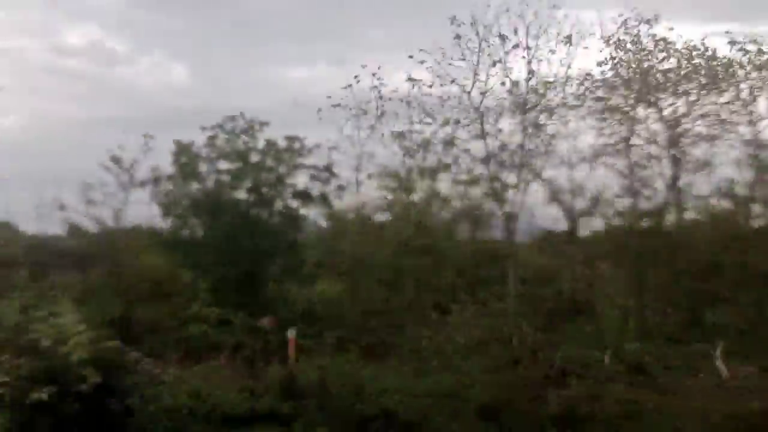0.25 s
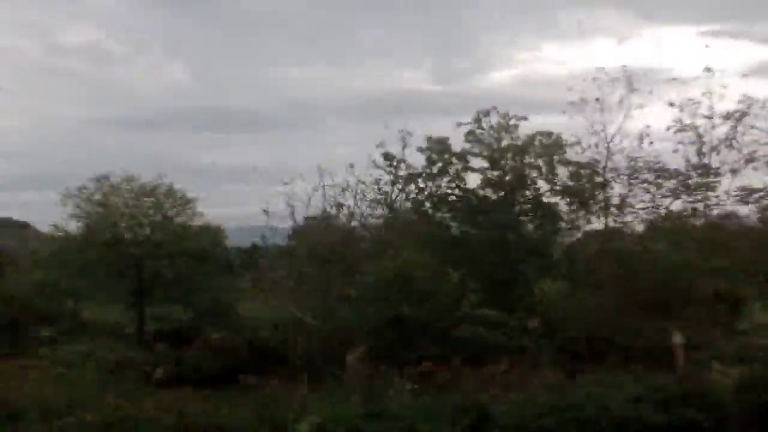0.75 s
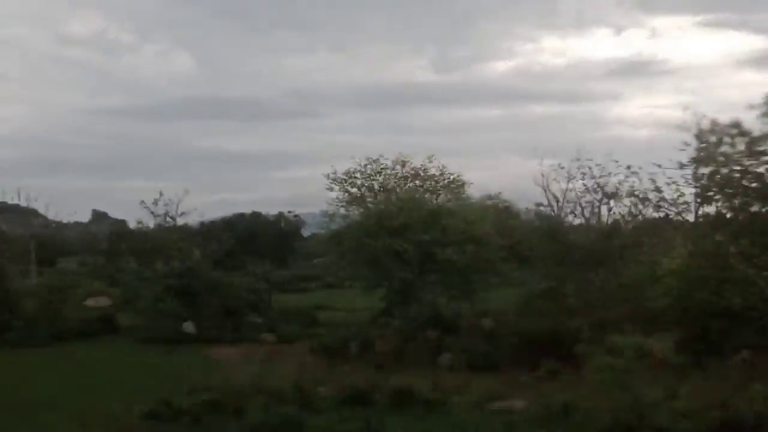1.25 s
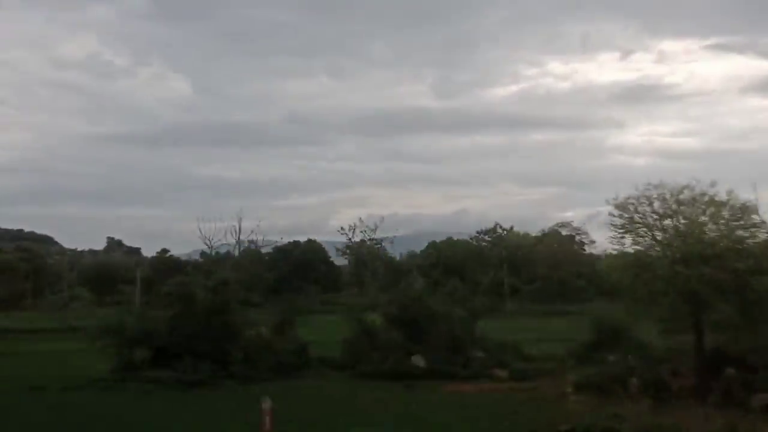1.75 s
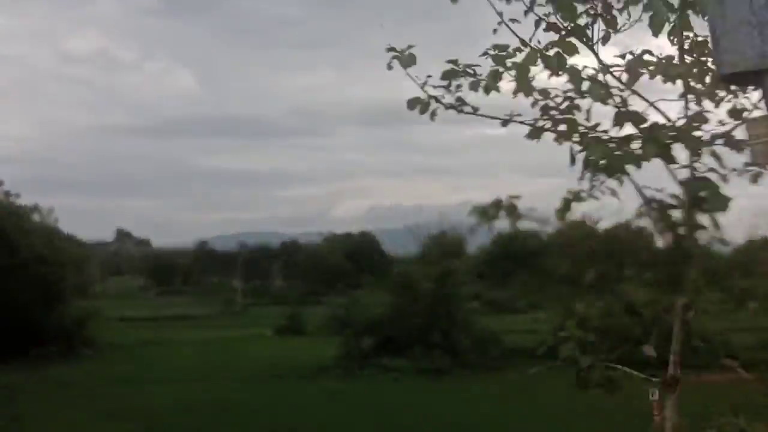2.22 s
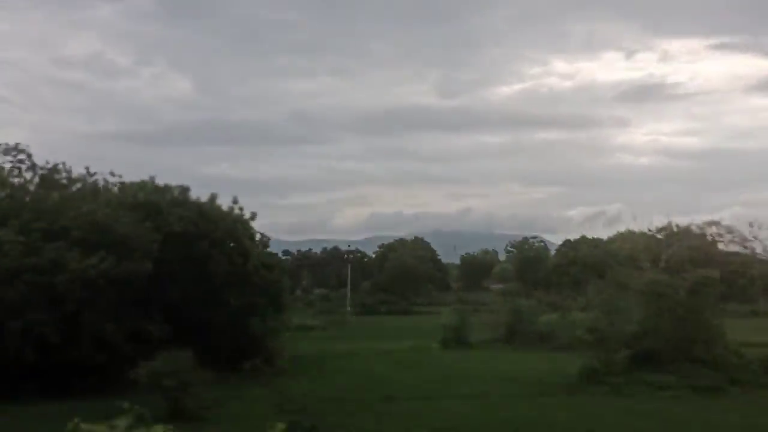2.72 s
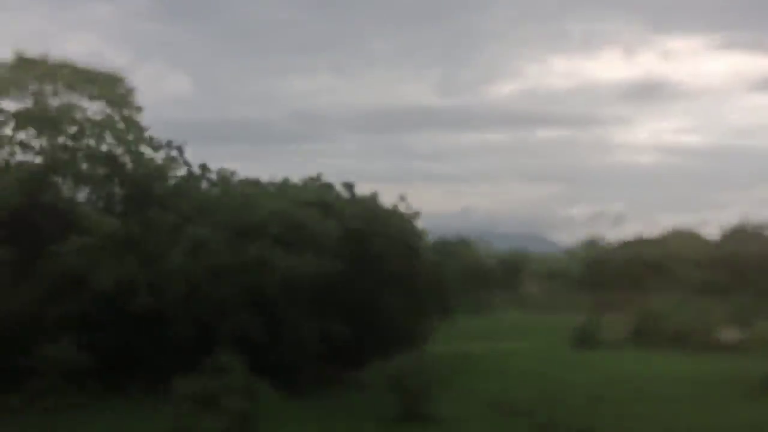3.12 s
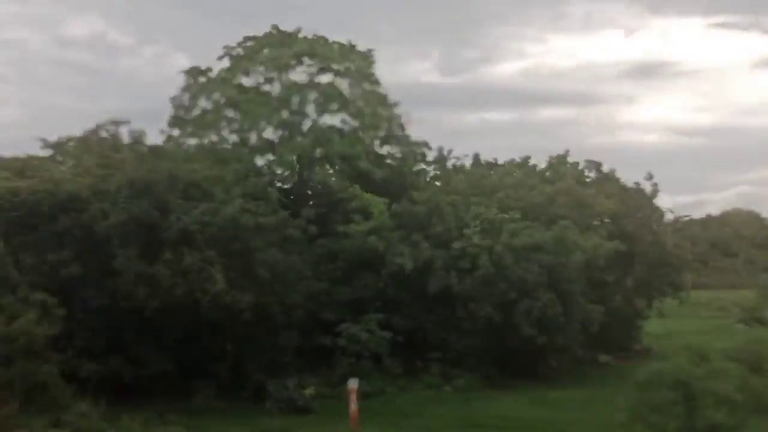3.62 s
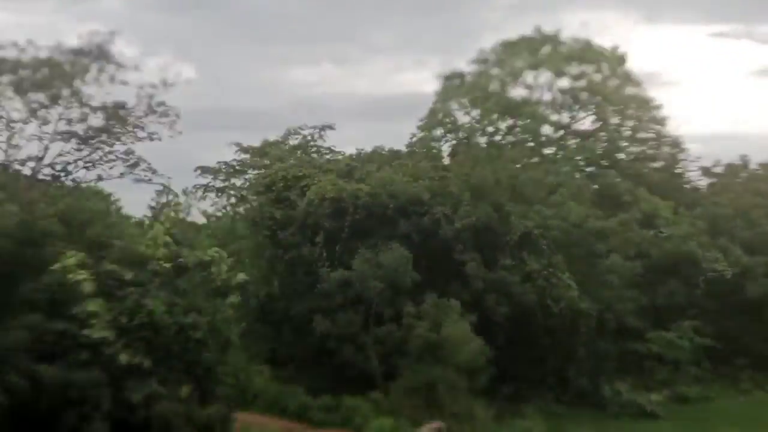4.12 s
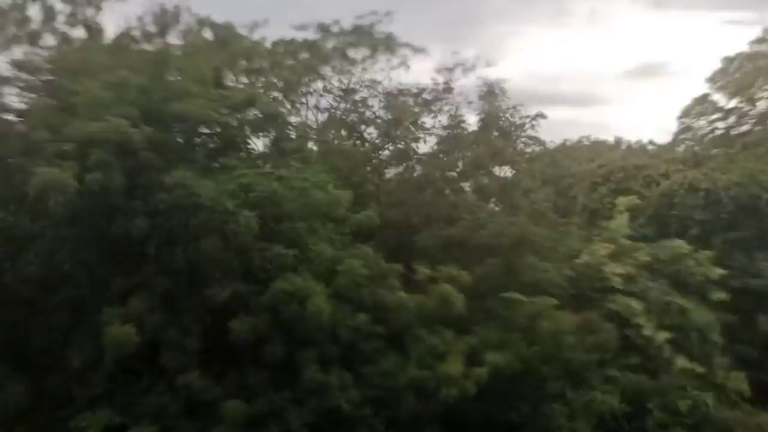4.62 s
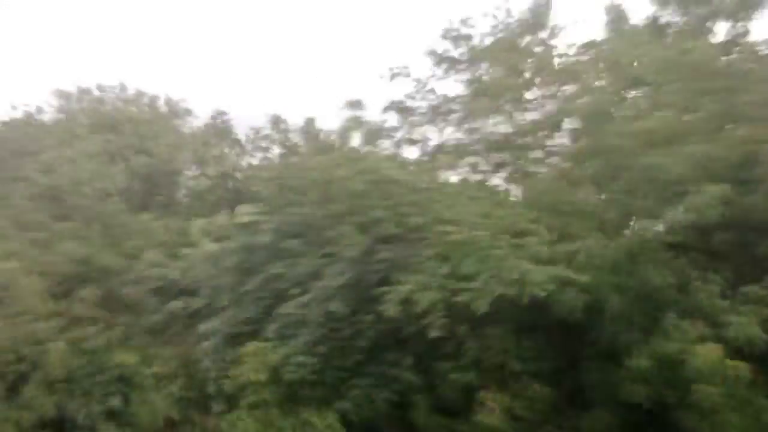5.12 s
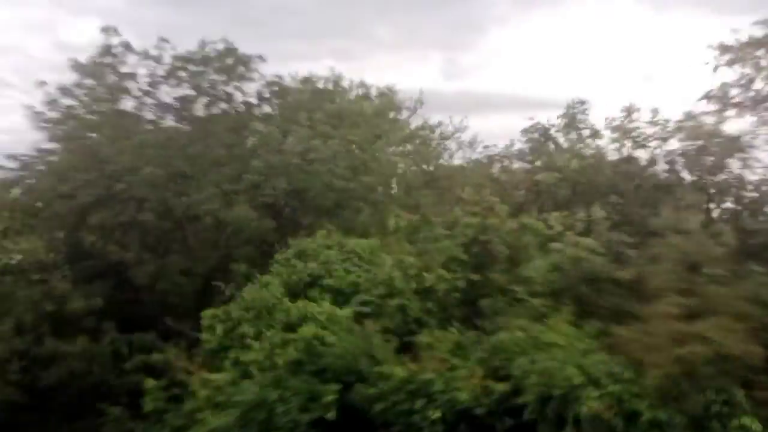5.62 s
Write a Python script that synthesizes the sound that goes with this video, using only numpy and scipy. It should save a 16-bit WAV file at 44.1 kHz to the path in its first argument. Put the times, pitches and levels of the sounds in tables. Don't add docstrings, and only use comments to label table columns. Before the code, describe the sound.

About six seconds from a phone held at the open window of a fast electric train in green open country. A broad, rough, hissy wheel-and-rail roar continues throughout, with a metallic ringing band and a mid-pitched gear whine plus a higher overtone, wavering in strength, throbbing rapidly and creeping very slightly upward. Low wind rumbles on the microphone. Hard, blunt, raspy slaps hit from 0.3 to 0.7 s, near 1.0 and 1.2, around 2.3 to 2.6, at 2.9 and 3.2, then in a dense battering from 3.7 to 4.6, and once near 5.0. The roar ducks abruptly around them and climbs back. A mast swishes faintly at 0.9 and others at 2.4 to 2.5, where grit cracks sharply on the pane; foliage brushes past softly around 4.4 and 4.8. The final second is steadier, with softer puffs and a barely audible, very high squeak at 5.7.

```python
import sys
import numpy as np
from scipy import signal
from scipy.fft import rfft, irfft, next_fast_len
from scipy.io import wavfile
from scipy.ndimage import uniform_filter1d, minimum_filter1d

SR = 44100
rng = np.random.default_rng(int(sys.argv[2]) if len(sys.argv) > 2 else 0)


def generate_wav(signal):
    frames = np.transpose(np.atleast_2d(signal))
    scaled = np.clip(frames, -1, 1) * 32767
    pcm = np.round(scaled).astype(np.int16)
    wavfile.write(sys.argv[1], SR, pcm)


def magnitude_from_level(level_db):
    exponent = np.asarray(level_db, float) / 20
    return 10 ** exponent


N = 258426
T = np.arange(N) / SR

# frequency in Hz, level in dB per Hz.
ROLLING_SPECTRUM = [(100, 8), (300, 13), (600, 11.5), (1000, 8.5), (1600, 7), (2600, 7), (3250, 0),
                    (3620, 4), (5900, -2), (7600, 2), (8700, -8), (9900, -13.5), (13200, -23),
                    (13700, -31.5)]
# frequency in Hz, width in Hz, level in dB.
WHEEL_MODES = [(1960, 120, -9), (2055, 60, -7), (2125, 70, -1), (2200, 80, -1), (2285, 100, -1),
               (2375, 90, -1), (2440, 60, -6)]
# time in seconds, mesh tone in dB, third harmonic in dB, both above the hiss.
GEAR_LEVELS = [(0, 9.5, 9), (.19, 10.5, 3.5), (.36, 4, 8.5), (.72, 10.5, -3), (.93, 6, -6), (1.4, 13, 4),
               (1.75, 10.5, -3), (1.98, 7, 3), (2.2, 9.5, 3), (2.55, 12.5, 8), (2.95, 11, -5),
               (3.3, 9.5, -2), (3.6, 12.5, 8.5), (4.14, 13, 9.5), (4.35, 8, 8), (4.86, 9.5, 5.5),
               (5.35, 7, -3), (5.86, 8, 5.5)]
# time in seconds, pitch in Hz.
MESH_PITCH = [(0, 718.2), (2, 720.3), (4, 722.3), (5.86, 723.6)]
# centre in seconds, level in dB, length in ms, rasp in dB.
HARD_EDDIES = [(0.293, -6, 8.2, -15), (0.505, -10.5, 14, -18), (0.533, -7.5, 11.4, -17),
               (0.579, -9.5, 13.5, -13.5), (0.674, -10.5, 14.5, -12.5), (0.712, -13, 18, -14.5),
               (0.966, -8, 51, -15.5), (0.987, -3, 7.5, -28), (1.204, -9, 16, -33), (2.332, -5.5, 11, -24),
               (2.366, -12.5, 26, -20.5), (2.451, -12, 18, -22.5), (2.535, -7, 21, -15),
               (2.548, -12, 20, -10), (2.569, -7, 27, -15.5), (2.884, -5, 15.5, -17),
               (3.179, -8.5, 16, -12.5), (3.193, -13, 11.3, -11.5), (3.725, -4.5, 19.6, -16.5),
               (3.838, -3.5, 2.2, -7.5), (3.861, -14, 15, -11), (3.994, -11, 19, -9),
               (4.037, -8.5, 33, -13), (4.063, -13, 36, -14), (4.123, -9, 19, -8.5),
               (4.142, -10.5, 31, -19.5), (4.268, -7.5, 23, -15.5), (4.481, -6.5, 15, -20),
               (4.571, -4, 40, -21.5), (4.96, -8, 18, -16.5)]
# centre in seconds, level in dB, length in ms.
SOFT_EDDIES = [(.178, -15, 30), (.484, -13, 12), (.553, -17.5, 23), (.655, -17, 10), (.703, -15, 8.9),
               (.903, -18, 50), (2.25, -15, 18), (4.82, -18, 55), (1.255, -18.5, 47), (1.309, -14, 19),
               (1.445, -12.5, 33), (1.759, -20, 30), (1.808, -17.5, 36), (1.947, -15, 58),
               (2.01, -15.5, 61), (2.305, -12, 40), (3.114, -15, 38), (3.531, -14, 18), (3.796, -12.5, 14),
               (3.829, -11, 42), (4.195, -14, 47), (4.535, -12, 39), (4.897, -9.5, 44), (5.024, -18, 23),
               (5.303, -17.5, 36), (5.49, -21.5, 120)]
# time in seconds, level in dB.
WIND_LEVELS = [(0.0, -23), (0.41, -20), (1.2, -23.5), (1.42, -19), (1.6, -24), (1.89, -16), (2.1, -26),
               (2.3, -16.5), (2.63, -20), (2.84, -26), (3.07, -23.5), (3.48, -23), (3.79, -29), (4.16, -18),
               (4.52, -29), (4.98, -20), (5.3, -22.5), (5.86, -24.5)]
# frequency in Hz, level in dB per Hz.
WIND_SPECTRUM = [(25, -42), (40, -16), (65, -1.5), (100, 2), (160, -1.5), (250, -6), (450, -11.5),
                 (900, -18), (1800, -49)]
# centre in seconds, length in ms,
# level in dB above the hiss, frequency in Hz.
LINESIDE_SWISHES = [
    (.80, 43, -22, 11000),
    (.895, 75, -10, 10500),
    (2.425, 60, -12, 13000),
    (2.48, 50, -17, 13500),
    (3.10, 43, -28, 11000),
    (4.40, 80, -22, 11000),
    (4.80, 130, -21, 10500),
]
# centre in seconds, length in ms, frequency in Hz, level in dB above the hiss.
FLANGE_SQUEAK = (5.7, 93, 12784, -24)
# start in seconds, peak in dB, frequency in Hz, width in Hz, decay in ms.
GRIT = [
    (.872, -33, 11500, 3000, 5),
    (4.122, -48, 13500, 3000, 4),
    (4.865, -42, 12000, 4000, 4),
    (2.4473, -22, 12500, 7000, 1.5),
    (2.452, -12, 7800, 3500, 2.3),
    (2.4556, -13, 7700, 1800, 4.3),
]
# start in seconds, depth in dB, hold in seconds.
GAIN_PULLS = [(0.0, 3, 0.073), (0.269, 6, 0.037), (0.485, 2, .02), (0.502, 9.5, 0.084), (.6, 6, 0.15),
              (0.925, 4.5, 0.094), (1.01, 3, 0.63), (2.497, 4, 0.44), (2.566, 6, 0.096),
              (2.865, 7.5, 0.054), (2.895, 5, 0.1), (3.145, 13.5, 0.068), (3.3, 2.5, 0.58),
              (3.702, 11, 0.066), (3.76, 13.5, 0.063), (3.824, 14, 0.029), (3.9, 6, 0.18), (4.045, 8, 0.05),
              (4.112, 10.5, 0.2), (4.35, 3.5, 0.2), (4.522, 9, 0.14), (4.866, 5, 0.063), (4.94, 7, 0.097),
              (5.078, 2.5, 0.28), (5.485, 1, 0.12), (5.674, 2, 0.064)]
# frequency in Hz, width in Hz, depth in dB.
DUCT_NOTCHES = [(4724, 370, -50.5), (9500, 230, -10)]

SHAFT_HZ, SHAFT_DEPTH = 38.45, 0.27
RING_DB, RING_DRIFT_DB = 7, 0.88
SWIRL_RASP_DB, JAG = -19, 0.54
SWING_HZ, PLAIN_RASP_DB, RASP_DB_PER_OCTAVE = 182.5, -16, 29.5
HISS_DB, DUCK_ATTACK_S, RECOVER_DB_PER_S = -33, 0.0093, 77
TOP_HZ = 15520


def columns(table):
    times, *values = np.transpose(table)
    return [np.interp(T, times, v) for v in values]


def unit(x):
    return x / np.sqrt(np.mean(x ** 2))


def shape(x, gain_of_hz):
    size = next_fast_len(len(x))
    hz = np.arange(size // 2 + 1) * SR / size + 1
    return irfft(rfft(x, size) * gain_of_hz(hz), size)[:len(x)]


def resonance(f, hz, width):
    return 1 / (1 + ((f - hz ** 2 / f) / width) ** 2)


def band(hz, width):
    return unit(shape(rng.standard_normal(N), lambda f: resonance(f, hz, width)))


def walk(rate):
    hold = int(SR / rate)
    steps = np.repeat(rng.standard_normal(N // hold + 1), hold)
    return unit(uniform_filter1d(uniform_filter1d(steps, hold), hold)[:N])


def flicker(spectrum, centres, shared_db, own_db, rate):
    hz, db = np.transpose(spectrum)
    shared = shared_db * walk(rate)
    white = sum(np.sqrt(f) * magnitude_from_level(shared + own_db * walk(1.6 * rate)) * band(f, f / 3) for f in centres)
    return shape(white, lambda f: magnitude_from_level(np.interp(np.log(f), np.log(hz), db)))


def rolling():
    centres = 100 * 2 ** np.arange(0, 7.6, 1 / 3)
    return magnitude_from_level(-41.0) * flicker(ROLLING_SPECTRUM, centres, shared_db=0.11, own_db=1.52, rate=13.0)


def wheels(ring_db):
    ring = sum(magnitude_from_level(db + 1.2 * walk(9)) * band(hz, width) for hz, width, db in WHEEL_MODES)
    return magnitude_from_level(ring_db) * unit(ring)


def gear(mesh_db, third_db):
    mesh_hz = columns(MESH_PITCH)[0] + .5 * walk(8)
    phase = 2 * np.pi * np.cumsum(mesh_hz) / SR
    shaft_phase = 2 * np.pi * np.cumsum(SHAFT_HZ + 2.0 * walk(6)) / SR
    throb = 1 + SHAFT_DEPTH * np.sin(shaft_phase)
    mesh = magnitude_from_level(mesh_db + 1.3 * walk(15)) * np.sin(phase)
    third = magnitude_from_level(third_db + 1.5 * walk(14)) * np.sin(3 * phase + .2 * walk(20))
    return np.sqrt(2) * throb * (mesh + third)


def buffets():
    out = np.zeros(N)
    crackle = magnitude_from_level(4.4 * walk(250))
    rasp = unit(shape(crackle * band(390.0, 860.0), lambda f: 1 / np.sqrt(1 + (f / 1500) ** 6)))
    t = np.arange(-4000, 4000) / SR
    eddies = list(HARD_EDDIES) + [(*row, SWIRL_RASP_DB) for row in SOFT_EDDIES]
    for (s, db, ms, rasp_db), chance in zip(eddies, rng.standard_normal((len(eddies), 60))):
        hz = SWING_HZ * 2 ** ((rasp_db - PLAIN_RASP_DB) / RASP_DB_PER_OCTAVE)
        i = int(s * SR) - 4000
        blow = np.exp(-1.2 * (2000 * t / ms) ** 2)
        wake = 0.18 * (t > 0) * (1 - np.exp(-t / 0.012)) * np.exp(-np.abs(t) / 0.039)
        envelope = blow + wake
        steepness = np.where(t < -ms / 4000, 8.0, .6)
        front = np.exp(-steepness * (2000 * t / ms + .5) ** 2)
        wobble = np.interp(t, np.linspace(t[0], t[-1], 60), chance)
        turn = chance[0] * 3 + 2 * np.pi * np.cumsum(1.05 * hz * 2 ** (0.453 * wobble)) / SR
        swing = np.sin(turn + JAG * np.sin(turn))
        heave = 0.67 * np.sin(chance[1] * 3 + 2 * np.pi * 0.6 * hz * t)
        push = envelope * (swing + heave)
        push *= np.sqrt(np.sum(envelope ** 2) / np.sum(push ** 2))
        bite = front * rasp[i:i + 8000]
        bite *= np.sqrt(np.sum(front ** 2) / np.sum(bite ** 2))
        out[i:i + 8000] += magnitude_from_level(db) * (push + magnitude_from_level(rasp_db + 7.0) * bite)
    return shape(out, lambda f: 1 / np.sqrt(1 + (60 / f) ** 6))


def wind():
    centres = 30 * 2 ** np.arange(0, 6, 1 / 3)
    rumble = flicker(WIND_SPECTRUM, centres, shared_db=1.5, own_db=1.46, rate=30.)
    return magnitude_from_level(columns(WIND_LEVELS)[0]) * unit(rumble)


def swishes():
    out = magnitude_from_level(-33.0 + 5.0 * walk(35)) * band(12500.0, 6000.)
    for s, ms, db, hz in LINESIDE_SWISHES:
        passing = np.exp(-(2000 * (T - s) / ms) ** 4)
        out = out + magnitude_from_level(db) * passing * band(hz, 4500.)
    s, ms, hz, db = FLANGE_SQUEAK
    return out + magnitude_from_level(db) * np.exp(-(2000 * (T - s) / ms) ** 2) * band(hz, 60.)


def ticks():
    out = np.zeros(N)
    t = np.arange(900) / SR
    for (s, db, hz, width, ms), grit in zip(GRIT, rng.standard_normal((len(GRIT), 900))):
        crack = shape(grit * np.exp(-1000 * t / ms), lambda f: resonance(f, hz, width))
        out[int(s * SR):][:900] += magnitude_from_level(db) * (t < .018) * crack / np.max(np.abs(crack))
    return out


def gain_control():
    pulls = []
    for s, db, hold in GAIN_PULLS:
        attack_s = DUCK_ATTACK_S if s > 0 else 1e-3
        fall = db * (T - s + 0.0011) / attack_s
        climb = db - RECOVER_DB_PER_S * (T - s - hold)
        pulls.append(np.clip(np.minimum(fall, climb), 0, db))
    return -np.max(pulls, axis=0)


def scene():
    gain_db = HISS_DB + gain_control()
    mesh_db, third_db = columns(GEAR_LEVELS)
    ring_db = RING_DB + RING_DRIFT_DB * walk(3.975)
    train = rolling() + wheels(ring_db) + gear(mesh_db, third_db) + swishes()
    steps_db = gain_db - uniform_filter1d(gain_db, size=6000)
    mix = magnitude_from_level(gain_db) * train + magnitude_from_level(0.3 * steps_db) * wind() + buffets() + ticks()
    return mix[None]


def low_pass(x):
    return signal.sosfilt(signal.butter(12, 15680, fs=SR, output="sos"), x)


def record(dry):
    def duct_db(f):
        return sum(db * np.exp(-np.abs((f - hz) / width) ** 1.245) for hz, width, db in DUCT_NOTCHES)

    heard = shape(dry[0], lambda f: (f < TOP_HZ) * magnitude_from_level(duct_db(f)))
    room_left = np.minimum(1, .86 / (np.abs(heard) + 1e-9))
    lowest = minimum_filter1d(room_left, size=400)
    heard = heard * uniform_filter1d(uniform_filter1d(lowest, size=200), size=200)
    return low_pass(heard[None])


dry = scene()
out = record(dry)
generate_wav(out)
```